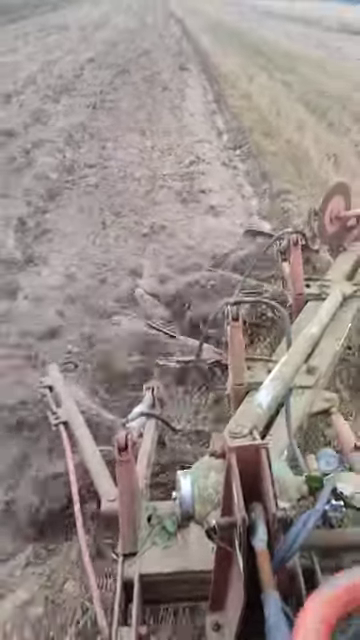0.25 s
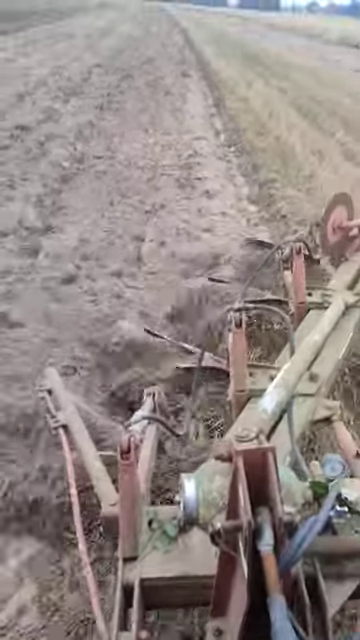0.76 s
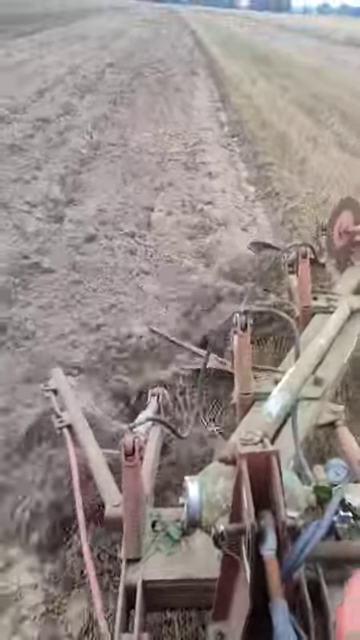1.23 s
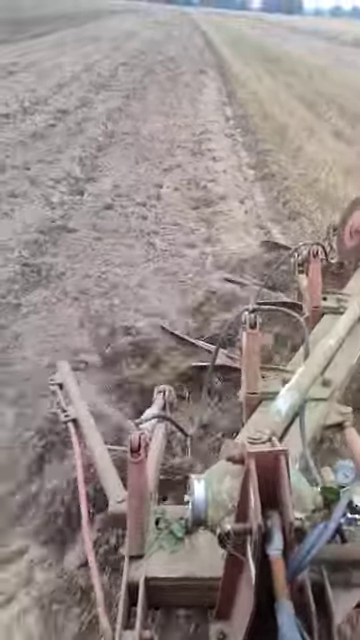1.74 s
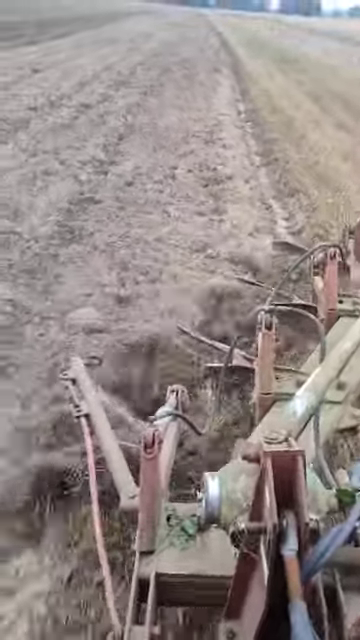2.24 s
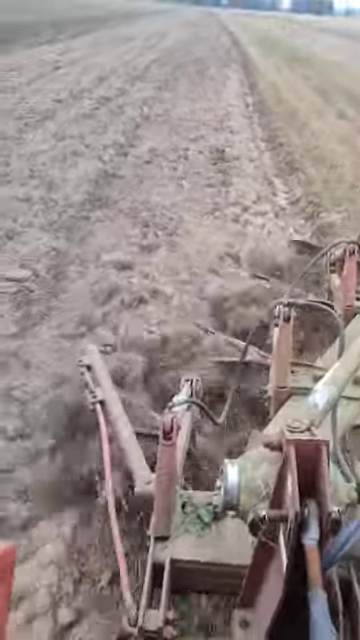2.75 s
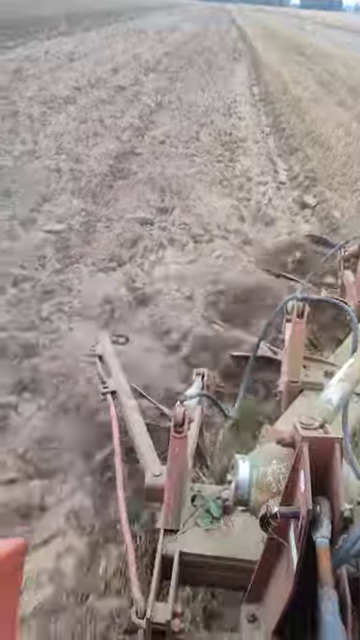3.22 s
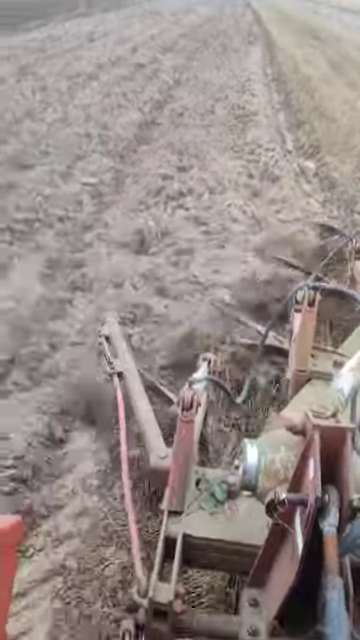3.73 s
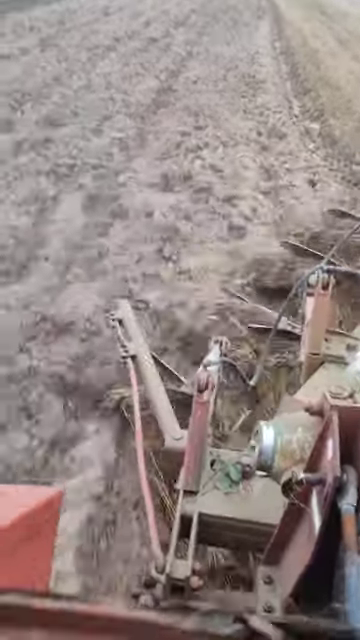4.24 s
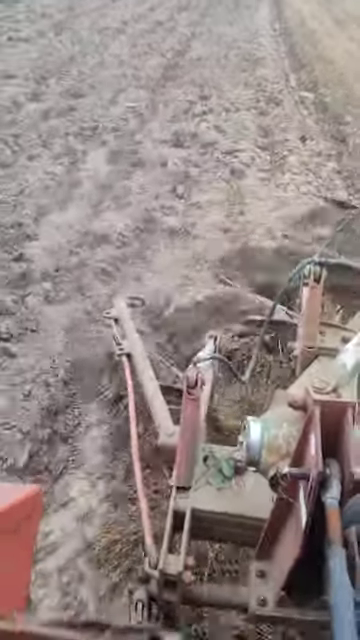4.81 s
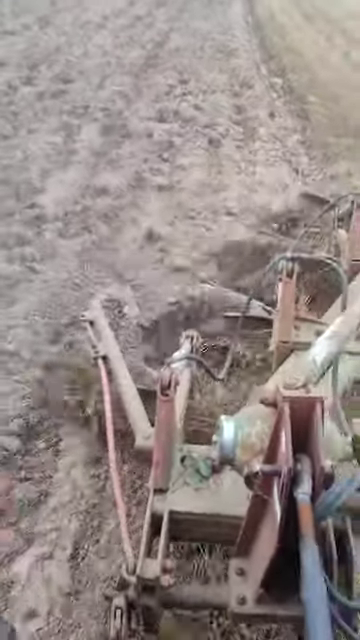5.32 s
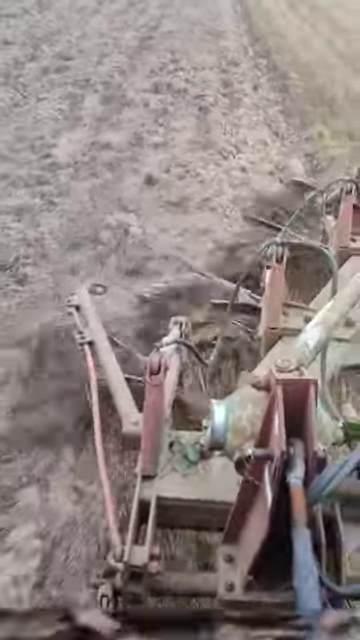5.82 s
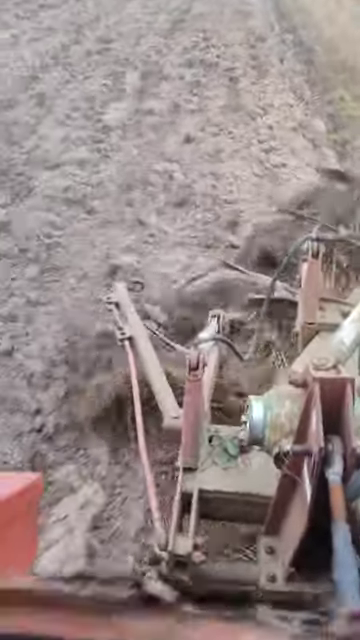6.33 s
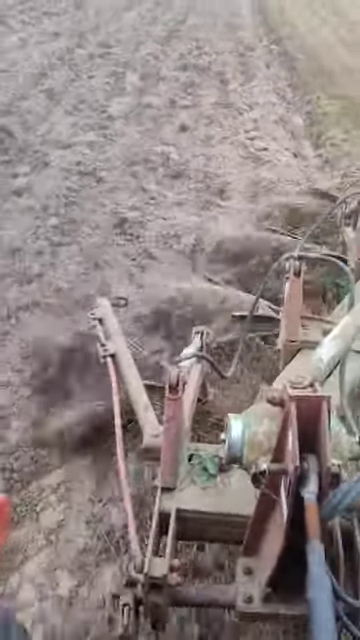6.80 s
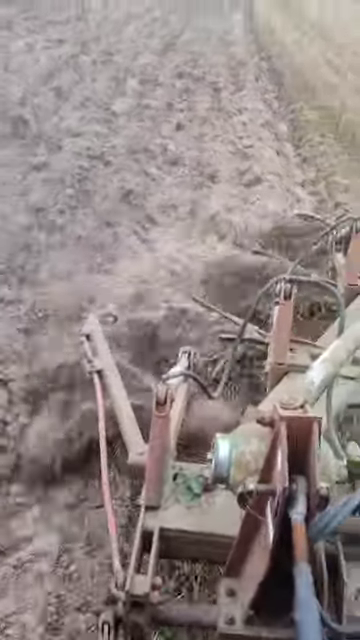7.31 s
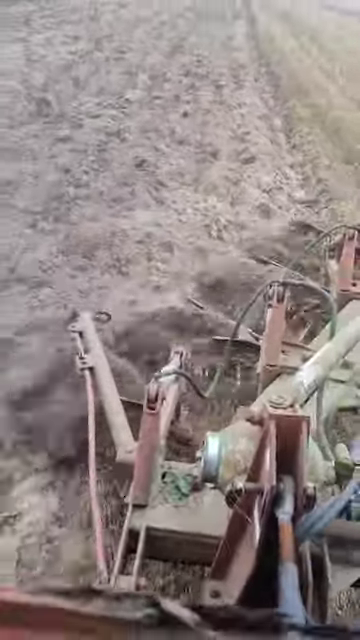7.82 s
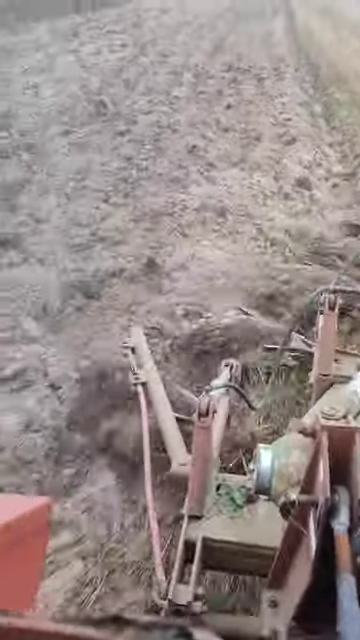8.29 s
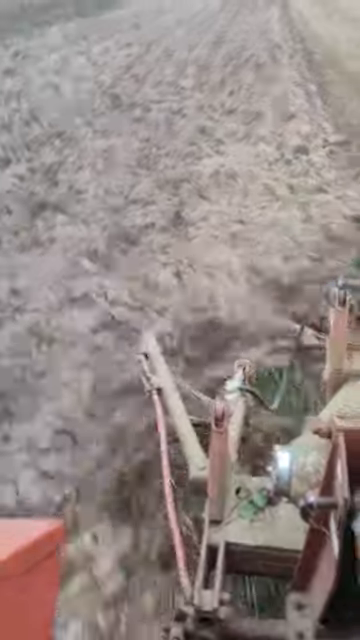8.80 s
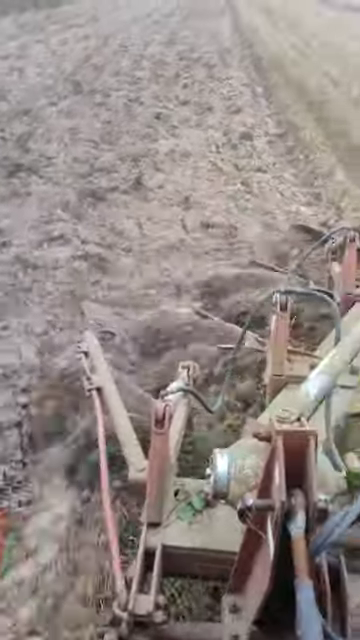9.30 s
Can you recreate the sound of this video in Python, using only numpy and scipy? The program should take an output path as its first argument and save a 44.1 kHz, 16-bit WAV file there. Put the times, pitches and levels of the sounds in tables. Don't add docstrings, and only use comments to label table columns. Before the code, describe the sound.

A six-cylinder tractor pulls a soil-working implement at nearly constant speed, loud and close throughout. The low engine drone chugs faintly, with hydraulic hum and rough hissing tines over it. From the middle onward, whining valve swells come and go, low cab thumps grow heavier, and sparse bright stone clicks sound mostly to the left. Phone microphone on the open cab, compressed and without crisp top end.

```python
import sys
import numpy as np
from scipy import signal
from scipy.fft import rfft, irfft, next_fast_len
from scipy.io import wavfile
from scipy.ndimage import uniform_filter1d, map_coordinates

SR = 44100
rng = np.random.default_rng(int(sys.argv[2]) if len(sys.argv) > 2 else 0)


def inscribe(sig):
    pcm = np.round(np.clip(np.atleast_2d(sig).T, -1, 1) * 32767)
    wavfile.write(sys.argv[1], SR, pcm.astype(np.int16))


def amplitude_ratio(level_db):
    exponent = np.asarray(level_db, float) / 20
    return 10 ** exponent


N = 421155
SIDES = np.array([[.5], [-.5]])


def seconds():
    return np.arange(N) / SR


def unit(x):
    return x / np.sqrt(np.mean(x ** 2) + 1e-20)


def along(points, hz):
    point_hz, value = np.transpose(points)
    return np.interp(np.log(hz + 1), np.log(point_hz + 1), value)


def curve(points):
    time_s, value = np.transpose(points)
    return np.interp(seconds(), time_s, value)


def wobble(rate_hz):
    knots = rng.standard_normal(int(N * rate_hz / SR) + 4)
    return map_coordinates(knots, [np.arange(N) * rate_hz / SR])


def filtered(x, response):
    size = next_fast_len(N + SR // 2)
    hz = np.fft.rfftfreq(size, 1 / SR)
    return irfft(rfft(x, size) * response(hz), size)[..., :N]


# time_s, cycles_hz
ENGINE_SPEED = [(0, 20.245), (.75, 20.22), (1, 20.125), (1.5, 20.185), (1.8, 20.09), (2.25, 20.205),
                (3, 20.355), (3.25, 20.48), (4.1, 20.65), (4.5, 20.535), (5, 20.575), (5.25, 20.47),
                (5.5, 20.55), (6.25, 20.585), (7, 20.765), (8, 20.74), (8.25, 20.795), (9.55, 20.685)]


def engine_speed_hz():
    return curve(ENGINE_SPEED)


def faster():
    speed_hz = engine_speed_hz()
    return (speed_hz - speed_hz.mean()) / (2 * speed_hz.std())


def tone(cycles, order, level_db, lean_db, lead_rad):
    start = rng.random() * (1 if order % 3 else .3)
    phase = 2 * np.pi * (order * cycles + start)
    return -amplitude_ratio(level_db + lean_db * SIDES) * np.sqrt(2) * np.cos(phase + lead_rad * SIDES)


# order, level_db, rise_db (low to high speed), left_right_db, left_lead_rad
CRANK_TONES = [(1, -44, 3.0, -2.5, -0.0), (3, -28.4, -0.0, -2.0, -0.1), (4, -42, -2.0, -2.2, -0.1),
               (6, -21.9, -1.0, -0.8, -0.1), (7, -29.4, 4.0, -4.4, -0.1), (8, -38.9, -1.0, -3.3, -0.5),
               (9, -29.2, 1.0, -6.4, 0.0), (10, -31.1, -4.0, -3.8, 0.1), (11, -41.4, -1.0, -7.2, 0.0),
               (12, -29.6, -2.0, -4.6, 0.2), (14, -35.4, 3.0, -5.3, -0.3), (15, -43.2, -1.0, -3.0, -1.2),
               (16, -32.5, -1.0, -3.1, -1.0), (17, -32.3, -0.0, -4.3, -0.5), (18, -39.0, 1.0, -5.6, -0.2),
               (19, -38.6, -4.0, -3.7, -0.5), (20, -37.5, -5.0, -2.7, -0.7), (21, -42.1, -1.0, 0.7, -0.7),
               (22, -40.9, -2.0, -7.0, -0.9), (24, -39.6, 4.0, -7.1, -1.2), (25, -36.3, 3.0, -2.6, -1.0),
               (26, -43.1, -3.0, -2.9, -0.4), (29, -40.7, -1.0, -8.8, -1.6),
                     (30, -41.1, -0.0, -2.5, -1.8), (32, -43.0, -2.0, -4.9, -0.3),
                     (33, -51, -5.0, 2.6, -0.8), (35, -44.5, -0.0, -3.2, -0.6), (36, -47.9, 0.0, 0.5, -1.0),
                     (39, -43, 2.0, -3.5, -1.5), (42, -49.0, 1.0, -5.0, 0.9), (46, -48.0, -3.0, -2.0, 1.2),
                     (48, -45.0, -2.0, -5.7, 0.9), (50, -48.1, -2.0, -2.4, -1.6),
                     (51, -47.1, -5.0, -3.4, 1.7), (60, -46.5, -6.0, -7.1, -2.6),
                     (63, -48.4, -2.0, -5.9, -2.5), (64, -49.1, -3.0, -4.8, -1.7),
                     (65, -49.3, -4.0, -3.1, -2.1), (66, -44.7, 1.0, -6.5, 2.4),
                     (67, -53, -7.0, -5.8, -1.0)]
# order, level_db, rise_db, left_right_db, left_lead_rad
SHAFT_TONES = [(21.15, -42.6, -2.0, 0.7, -0.6), (29.4, -37.8, -4.0, -5.7, -1.9),
               (49.5, -42.8, -1.0, 3.3, -2.8), (65.9, -47.8, 1.0, -5.5, 2.1),
               (76.0, -50.5, -3.0, -6.0, 0.9)]
# order, level_db, rise_db, left_right_db, left_lead_rad
FAINT_TONES = [(17.5, -42, 0, -4, -.6), (27, -47, 0, -4, -1.2), (40, -49, 0, -3, -1.6),
               (41, -51, 0, -4, -1.8), (45, -47.5, -3, -3, -2), (61, -50.5, 0, -4, -2.8),
               (68, -50.5, 0, -4, 2.4), (72, -52, 0, -4, 2.2), (23, -46, 0, -5, -.3),
               (31, -48, 0, -3.5, -.8), (34, -48, 0, -2, -1), (42.3, -48, -3, -5, -1.2),
               (44, -46, 0, 0, -1.3), (49, -48, -2, -1.5, -1), (55, -48, 0, -4, -1.1),
               (57, -47, 0, -4.5, -1.8), (69, -49, 0, -2, 1.8)]


def drone(cycles):
    out = np.zeros((2, N))
    pace = faster()
    for order, db, rise_db, lean_db, lead_rad in CRANK_TONES + SHAFT_TONES + FAINT_TONES:
        sway_db = min(.1 + .15 * order, 1.6) * (.45 * wobble(1.5) + .85 * wobble(7))
        lift_db = np.clip(.16 * (order - 12), 0, 2.8) - .5
        level_db = db + lift_db + rise_db * pace + sway_db
        jittered = cycles + .00064 * wobble(6)
        out += tone(jittered, order, level_db, lean_db, lead_rad)
    return out


def swell(start_s, end_s):
    t = seconds()
    valve_s = .09
    return np.clip(np.minimum(t - start_s, end_s - t) / valve_s, 0, 1)


# time_s, level_db
PUMP_PRESSURE = [(0, -28), (.8, -39.5), (1.05, -34), (1.7, -29.5), (2.2, -26.5), (2.8, -25.5), (3.25, -24),
                 (3.6, -30), (3.85, -24), (5.1, -25.5), (5.55, -33), (6, -26), (6.6, -35.5), (7.1, -25),
                 (7.8, -23.5), (8.1, -29.5), (8.85, -24), (9.4, -35.5)]
# start_s, end_s, level_db
VALVE_OPENINGS = [
    (2.85, 3.451, -34),
    (3.498, 4.198, -36.5),
    (4.298, 4.946, -41),
    (5.08, 5.899, -36.5),
    (6.093, 6.282, -32.5),
    (6.349, 6.8, -35),
    (7.55, 7.9, -35),
    (7.979, 8.3, -35),
    (8.6, 8.952, -34.5),
    (9.02, 9.35, -32.5),
]
# start_s, end_s, level_db
PUMP_SQUEALS = [(3.52, 3.8, -42)]


def pump(cycles):
    order = 7.35
    wander = cycles + .0025 * wobble(4) + .001 * wobble(30)
    pulse_db = curve(PUMP_PRESSURE) + 1.5 * wobble(9)
    pulse = tone(wander + .012 * wobble(6.2), order, pulse_db, -2.8, -.1)

    valve = amplitude_ratio(-39.5 - 3.5 * faster())
    for start_s, end_s, db in VALVE_OPENINGS:
        valve = valve + amplitude_ratio(db) * swell(start_s, end_s)
    whine = valve * tone(wander, 8 * order, 1.2 * wobble(20) - 1.3, -1.4, 1.2)
    whine += tone(wander, 12 * order, -47 + 3.1 * wobble(7.2), -1.5, 2.2)
    for start_s, end_s, db in PUMP_SQUEALS:
        whine += swell(start_s, end_s) * tone(cycles, 16 * order, db + wobble(25), -.5, .3)
    return pulse + whine


# freq_hz, correlation
PORT_LIKENESS = [(60, .99), (130, .95), (220, .87), (330, .72), (450, .58), (650, .45), (850, .3),
                 (1150, .33), (1600, .15), (7000, .06)]
# freq_hz, left_right_db
PORT_BALANCE = [(60, -7.5), (100, 4), (170, -6.5), (300, -3), (500, -3), (860, -0.5), (1460, -6),
                (2480, -0.5), (4220, -0.5), (7180, 7.5)]


def rush(spectrum, patchy_db):
    left_lag_s = .000401
    bins = signal.stft(rng.standard_normal((2, N)), nperseg=512)[2]
    patches = uniform_filter1d(rng.standard_normal(bins.shape[1:]), size=6, axis=0)
    patches = uniform_filter1d(patches, size=14, axis=1)
    pair = signal.istft(bins * amplitude_ratio(patchy_db * unit(patches)), nperseg=512)[1][:, :N]

    def mid_side(hz):
        angle = np.arccos(np.clip(along(PORT_LIKENESS, hz), -1, 1)) / 2
        return amplitude_ratio(along(spectrum, hz)) * [np.cos(angle), np.sin(angle)]

    def ports(hz):
        left = amplitude_ratio(along(PORT_BALANCE, hz) / 2) * np.exp(-1j * np.pi * hz * left_lag_s)
        return np.array([left, 1 / left])

    mid, side = filtered(pair, mid_side)
    both = filtered(np.array([mid + side, mid - side]), ports)
    return both / np.sqrt(np.mean(both.mean(axis=0) ** 2))


# freq_hz, density_db
ENGINE_SPECTRUM = [(180, -30), (300, -6), (338, 1), (378, -13), (463, -4.5), (509, -4), (559, -4.5),
                   (603, -5.5), (698, -6), (998, -6.5), (1080, -7.5), (1190, -6), (1680, -13.5),
                   (2150, -25), (2300, -22), (2990, -49), (5060, -120)]
# freq_hz, density_db
SOIL_SPECTRUM = [(1180, -21.5), (2000, -3.5), (2150, -5.5), (2390, -3.5), (2770, 0), (3560, -5),
                 (4530, -9.5), (5640, -8.5), (6630, -17), (7630, -33.5), (9920, -60.5), (16800, -120)]
# freq_hz, density_db
RUMBLE_SPECTRUM = [(15, -15), (28, -3.5), (55, -1), (75, -0.5), (100, -6.5), (125, -3.5), (165, -0.5),
                   (220, -6), (270, -1), (315, -13), (450, -15.5), (700, -56.5)]
# centre_hz, width_hz, gain_db
CAB_PANELS = [(706, 22, -2), (810, 55, -1.5), (935, 31, -2), (1120, 120, 1), (1582, 86, 4),
              (1634, 90, -3.5), (1797, 60, 5), (2406, 190, 2.5), (3020, 260, 0.5), (3480, 250, -2)]


def roar(cycles):
    load_db = -.5 * faster() + .3 * wobble(3.4)
    throb_db = .95 * np.cos(2 * np.pi * 3 * cycles) + .5 * np.cos(2 * np.pi * cycles)
    engine_db = -23.5 + load_db - 3 + throb_db + .37 * wobble(12)
    engine = amplitude_ratio(engine_db) * rush(ENGINE_SPECTRUM, patchy_db=.5)

    clods_db = .5 * wobble(16) + .6 * wobble(60) + .3 * throb_db
    soil_db = -34 + load_db + .23 * wobble(6) - .15 + clods_db
    soil = amplitude_ratio(soil_db) * rush(SOIL_SPECTRUM, patchy_db=.9)

    def panels(hz):
        gain_db = 0
        for centre_hz, width_hz, db in CAB_PANELS:
            gain_db = gain_db + db / (1 + (2 * (hz - centre_hz) / width_hz) ** 2)
        return amplitude_ratio(gain_db)

    rumble = amplitude_ratio(-24.5 + 1.2 * wobble(3)) * rush(RUMBLE_SPECTRUM, patchy_db=-1.1)
    return filtered(engine + soil, panels) + rumble


# peak_s, peak_db, length_s
RUT_JOLTS = [(0.399, -26.5, 0.16), (0.699, -27, .3), (1.098, -29, .25), (1.615, -24, .2),
             (2.028, -25, 0.31), (2.557, -21, 0.2), (2.733, -22.5, 0.21), (3.1, -24, 0.24),
             (3.42, -22.5, 0.31), (3.797, -25, .5), (4.27, -17, .25), (4.596, -24, 0.22),
             (4.906, -19.5, 0.35), (5.273, -22.5, .15), (5.6, -30, 0.33), (5.901, -21, 0.24),
             (6.162, -22.5, 0.17), (6.391, -23.5, 0.25), (6.77, -19, 0.13), (6.99, -16, 0.18),
             (7.304, -24, .3), (7.68, -27, .45), (8.108, -21, 0.22), (8.453, -23, 0.22), (8.768, -17, 0.27),
             (9.243, -21, 0.27), (9.453, -25, 0.18)]


def cab(cycles):
    t = seconds()
    shake = amplitude_ratio(-33.5)
    for peak_s, db, length_s in RUT_JOLTS:
        shake = shake + amplitude_ratio(db) * np.exp(-(2 * (t - peak_s) / length_s) ** 2)
    shaft = amplitude_ratio(-39) + amplitude_ratio(-8.5) * uniform_filter1d(shake, size=SR // 4)
    boom = shake * tone(cycles, 2, 0, -3, 0)
    return boom + shaft * tone(cycles, 2.4, 2 * wobble(7), -.5, -.1)


# start_s, peak_db, pitch_hz, left_right_db
STONE_HITS = [
    (1.864, -33, 5400, 8.5),
    (3.9552, -33, 5330, 4.5),
    (4.436, -30.5, 5760, 7),
    (4.582, -32.5, 5000, 6),
    (5.053, -22.5, 5490, 5.5),
    (5.1574, -32.5, 6640, 7),
    (5.91, -26.5, 5830, 6.5),
    (6.1935, -35, 6410, 5),
    (6.5298, -35, 6830, 3),
    (7.97, -36, 5660, 8),
]


def stones():
    out = np.zeros((2, N + SR))
    t = np.arange(SR // 50) / SR
    bright = signal.butter(3, [3900, 6900], "band", fs=SR)

    def blip(hz, at_s, width_s):
        return np.sin(2 * np.pi * hz * t) * np.exp(-((t - at_s) / width_s) ** 2)

    for start_s, db, pitch_hz, lean_db in STONE_HITS:
        envelope = (t < .0045) + .3 * amplitude_ratio(-60 * t / .03)
        scratch = signal.lfilter(*bright, rng.choice([-1, 1], (2, len(t))) * envelope)
        touch = .55 * blip(.75 * pitch_hz, .0017, .001)
        chip = blip(pitch_hz, .0034, .001)
        first = round((start_s - .001) * SR)
        gain = amplitude_ratio(db + 1 + (lean_db + 5) * SIDES)
        out[:, first:first + len(t)] += gain * (scratch + touch + chip)
    return out[:, :N]


def scene():
    cycles = np.cumsum(engine_speed_hz()) / SR
    return drone(cycles) + pump(cycles) + roar(cycles) + cab(cycles) + stones()


def level_db(x, size):
    power = np.abs(uniform_filter1d(np.mean(x ** 2, axis=0), size=size))
    return uniform_filter1d(10 * np.log10(power / np.mean(power) + 1e-9), size=size // 2)


def low_pass(x):
    return signal.sosfilt(signal.butter(12, 7780, fs=SR, output="sos"), x)


def record(dry):
    sensed = filtered(dry, lambda hz: amplitude_ratio(4.5 * (hz < 56)))
    slow_db = -.4 * level_db(sensed, size=round(.1 * SR))
    fast_db = -.17 * level_db(dry, size=1500)
    held = amplitude_ratio(slow_db + fast_db) * dry
    held = held / (1 + np.abs(held / .95) ** 5) ** (1 / 5)
    mix = filtered(held, lambda hz: np.clip((7700 - hz) / 120, 0, 1))
    return low_pass(mix)


dry = scene()
out = record(dry)
inscribe(out)
```